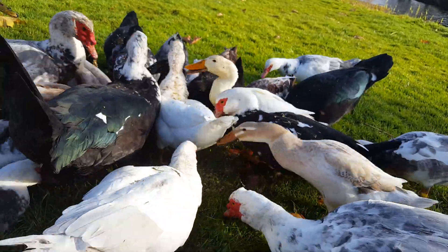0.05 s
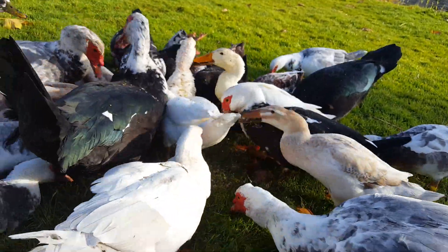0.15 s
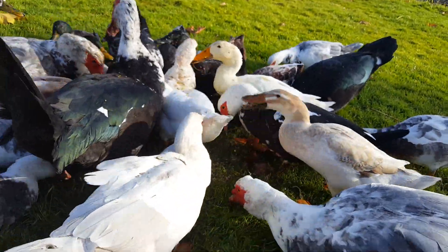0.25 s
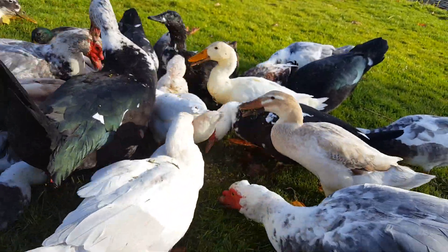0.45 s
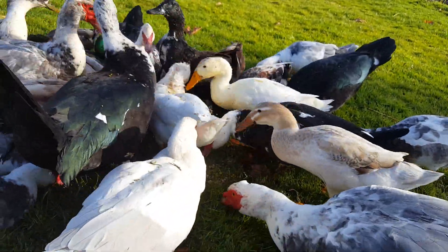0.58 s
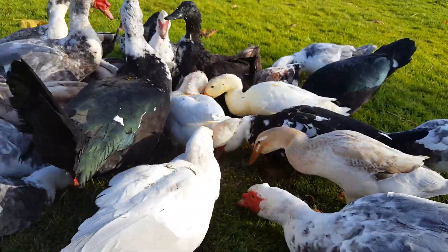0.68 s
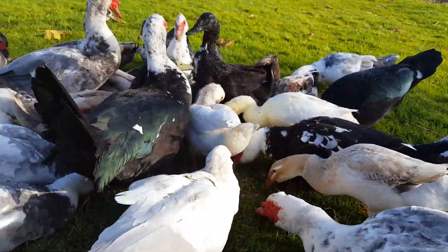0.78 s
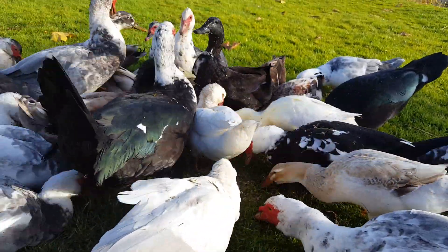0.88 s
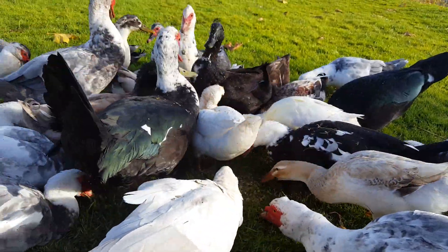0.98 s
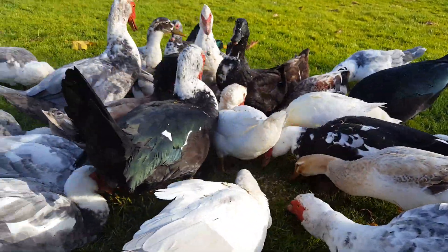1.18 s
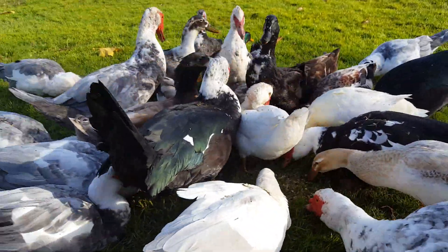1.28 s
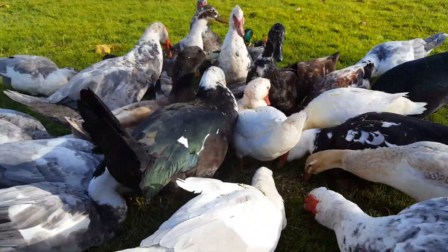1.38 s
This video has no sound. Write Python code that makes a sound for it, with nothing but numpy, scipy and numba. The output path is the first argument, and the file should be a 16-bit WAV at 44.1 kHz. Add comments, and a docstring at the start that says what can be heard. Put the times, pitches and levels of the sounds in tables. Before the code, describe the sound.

A duck gives one short, low quack at about 0.25 seconds, close by and louder than everything else. From the start, feathers and grass rustle and crackle softly over quiet outdoor air, with a soft thud and scattered pecks and bill snaps. A faint hoarse tone wavers around 0.8 seconds. The pecking continues, and a few low thuds come between 1.0 and 1.5 seconds.

```python
"""Ducks feed on a lawn close to the microphone. From the start, feathers and grass rustle and crackle
over quiet outdoor air; a soft thud sounds and bills begin to snap and peck. A quarter second in, one duck
gives a short, low quack: about a dozen pulses ring its throat while the bill opens and shuts.
The pecking goes on, a faint hoarse tone wavers past around 0.8 s, and more low thuds close the scene."""
import sys
import numpy as np
from scipy import signal
from scipy.fft import rfft, irfft
from scipy.io import wavfile
from scipy.ndimage import uniform_filter1d
from numba import njit

SR = 44100
rng = np.random.default_rng(int(sys.argv[2]) if len(sys.argv) > 2 else 0)


def materialize(psi):
    """Save the field psi as 16-bit PCM at rate SR to the path in sys.argv[1].

    A 1-D psi becomes a single channel; in a 2-D psi each row is a channel.
    """
    bounded = np.clip(np.atleast_2d(psi).T, -1, 1)
    quanta = np.round(bounded * 32767).astype(np.int16)
    wavfile.write(sys.argv[1], SR, quanta)


N = 63945
T = np.arange(N) / SR
TOP_HZ = 15950


def undb(db):
    """Decibels to gain."""
    return 10 ** (np.asarray(db) / 20)


def unit(x):
    """Scale to rms 1."""
    return x / np.sqrt(np.mean(x ** 2))


def curve(rows, column=1):
    """An automation lane: one column of a table, joined by straight lines in time."""
    rows = np.array(rows, float)
    return np.interp(T, rows[:, 0], rows[:, column])


def spectrum(points):
    """An EQ curve: (Hz, value) points spread over all frequency bins."""
    hz, value = np.array(points, float).T
    return np.interp(np.log(np.fft.rfftfreq(N, 1 / SR) + 1), np.log(hz), value)


def pan(db):
    """Left and right gains for a level difference; positive is left."""
    return undb(np.array([[db], [-db]]) / 2)


def decay(start, t60):
    """A hard attack and an exponential tail."""
    return (T >= start) * np.exp(-np.log(1000) * np.maximum(T - start, 0) / t60)


def swell(crest, half_length):
    """A bell-shaped fade in and out."""
    return np.exp(-.5 * ((T - crest) / half_length) ** 2)


def wobble(rate_hz):
    """Smooth random modulation with a spread of 1."""
    hold = int(SR / rate_hz)
    steps = np.repeat(rng.standard_normal(N // hold + 1), hold)
    return unit(uniform_filter1d(steps, hold))[:N]


@njit
def svf(x, hz, width):
    """State-variable resonator with a moving centre: its band-pass and low-pass outputs."""
    y, band_state, low_state = np.empty((2, len(x))), 0., 0.
    for i in range(len(x)):
        g, damping = np.tan(np.pi * hz[i] / SR), width / hz[i]
        v = (band_state + g * (x[i] + 1e-18 - low_state)) / (1 + g * (g + damping))
        y[0, i], y[1, i] = damping * v, low_state + g * v
        band_state, low_state = 2 * v - band_state, low_state + 2 * g * v
    return y


def band(x, hz, width):
    """One resonance."""
    return svf(x, np.minimum(hz * np.ones(len(x)), TOP_HZ), float(width))[0]


def steep_band(x, hz, width):
    """The same resonance twice, for steeper skirts."""
    return band(band(x, hz, width), hz, width)


# how alike left and right are in the ambience (frequency [Hz], likeness [0-1])
STEREO_LIKENESS = [(30, 0), (70, 0.33), (130, 0.19), (300, 0.87), (1200, 0.71), (2200, 0.018), (4000, 0),
                   (15000, 0)]
# which way its treble leans (frequency [Hz], left minus right [dB])
STEREO_LEAN = [(1500, 0), (4000, -5), (7500, 3.5), (15000, 2.5)]


def stereo_noise(colour_db=0):
    """Coloured noise, narrow in the mids and wide in the treble, whose top leans left."""
    alike, sides = np.clip(spectrum(STEREO_LIKENESS), 0, 1), np.array([[1], [-1]])
    mid, side = rfft(rng.standard_normal((2, N))) * undb(colour_db)
    left_right = mid * np.sqrt(1 + alike) + side * np.sqrt(1 - alike) * sides
    return unit(irfft(left_right * undb(spectrum(STEREO_LEAN) * sides / 2), N))


def noise_band(hz, width):
    """A steep band of stereo noise."""
    return unit(np.array([steep_band(channel, hz, width) for channel in stereo_noise()]))


# tone of the outdoor bed (frequency [Hz], relative level [dB])
AIR_EQ = [(15, -38), (25, -8), (87, 1), (200, -9), (277, -2), (754, -17), (1370, -11), (7510, -23),
          (9570, -33), (12500, -27), (16000, -37)]


def background():
    """Quiet outdoor air, the rumble of a light breeze on the microphone and a faint, distant drone."""
    air = undb(-49) * stereo_noise(spectrum(AIR_EQ))
    rumble = undb(-49) * noise_band(hz=91.6, width=101)
    drone = undb(-58) * noise_band(hz=266, width=56)
    return air + rumble + drone


# faders of the three rustle layers (time [s], low mids [dB], mids [dB], treble [dB])
RUSTLE_LEVELS = [(0, -54.5, -50, -86), (.07, -56.5, -54.5, -61), (.11, -52, -58.5, -52),
                 (.2, -50, -48.5, -57.5), (.4, -58.5, -59, -57.5), (.47, -47, -65, -52),
                 (.5, -53.5, -60, -50.5), (.56, -52, -57, -50.5), (.62, -49, -66, -55.5),
                 (.69, -56, -69, -57.5), (.77, -58, -53.5, -54), (.84, -73, -53, -63),
                 (.94, -53.5, -49.5, -56.5), (1.05, -53.5, -48.5, -53.5), (1.11, -48, -49.5, -56.5),
                 (1.23, -51.5, -47, -51.5), (1.3, -57.5, -55.5, -59), (1.34, -52, -77, -49.5),
                 (1.38, -54.5, -83, -60.5), (1.45, -47, -69, -62)]
# the low-mid and mid layers (centre [Hz], width [Hz])
RUSTLE_MIDS = [(760, 570), (1400, 1190)]
# tone of the treble layer (frequency [Hz], relative level [dB])
SWISH_EQ = [(1500, -6), (3500, 12.5), (5500, 3.5), (7800, 8.5), (10000, -2), (13000, 2.5), (16000, -4.5)]
SWISH_PAN_DB, FLUTTER_DB = 2.5, 2.5


def rustle():
    """Feathers and grass brush in uneven swells as the birds jostle."""
    layers = [noise_band(hz, width) for hz, width in RUSTLE_MIDS]
    layers.append(stereo_noise(spectrum(SWISH_EQ)) * pan(SWISH_PAN_DB))
    mix = sum(layer * undb(curve(RUSTLE_LEVELS, column)) for column, layer in enumerate(layers, 1))
    return mix * undb(FLUTTER_DB * wobble(120))


def crackles(per_s=60, centre_hz=5900, softest_db=-53.5, spread_db=6):
    """Grass blades tear and snap at random all around."""
    out, size = np.zeros((2, N)), 512
    for when, softness, pitch, place in rng.random((int(per_s * N / SR), 4)):
        hz = centre_hz * 2 ** (1.6 * (pitch - .5))
        tick = band(rng.standard_normal(size) * decay(0, t60=0.0053)[:size], hz, hz * 0.5)
        gain = undb(softest_db - spread_db * np.log(max(softness, .12)))
        position = pan(SWISH_PAN_DB / 2 + 20 * (place - .5))
        i = int(when * (N - size))
        out[:, i:i + size] += position * gain * tick / abs(tick).max()
    return out


# low bumps (crest time [s], half length [s], level [dB])
THUD_CUES = [(0.02, 0.0086, -36), (0.774, 0.032, -44.5), (1.034, 0.023, -37), (1.331, 0.02, -39),
             (1.401, 0.014, -32.5), (1.449, 0.0087, -31)]


def thuds():
    """Soft low bumps, a few cycles each: short swells of a levelled rumble."""
    envelope = sum(undb(db) * swell(crest, half_length) for crest, half_length, db in THUD_CUES)
    rumble = noise_band(hz=108.5, width=88)
    running_power = uniform_filter1d(np.mean(rumble ** 2, axis=0), int(0.031 * SR))
    return envelope * rumble / np.sqrt(running_power)


# pecks and bill snaps
# (time [s], ring peak [dB], ring pitch [Hz], knock re ring [dB], ring t60 [s], left minus right [dB])
PECK_CUES = [(0.089, -38, 2280, -18, 0.041, -1), (0.1454, -27.5, 3950, -9.5, 0.0048, -1),
             (0.2053, -34, 1210, 8, 0.015, -1), (0.3556, -33, 1410, 4, 0.016, 0),
             (0.3551, -33, 5760, -5, 0.0026, 9), (0.3927, -34.5, 3800, -2, 0.015, -2),
             (0.4461, -39, 4600, -22, 0.013, -12), (0.626, -36.5, 3400, -3, 0.016, -8),
             (0.6461, -24.5, 3290, -12, 0.0017, 3.5), (0.7201, -38, 6900, 0.5, 0.0055, 3),
             (0.7457, -41.5, 5100, 3, 0.0078, -7), (.893, -41, 5600, 3.5, .008, 7),
             (0.948, -38.5, 4640, -3, 0.0062, -1), (1.0672, -35.5, 1300, -10, .008, -5),
             (1.081, -46, 1180, 8, 0.0084, 4), (1.096, -38.5, 3560, 4, 0.016, -9.5),
             (1.153, -42, 5950, -12, 0.012, 12), (1.211, -38, 6550, -10, 0.024, -2),
             (1.227, -39, 7040, -13, .006, 8), (1.2444, -28.5, 1250, -12, 0.014, 1.5),
             (1.2447, -39.5, 4530, -9, .007, -2)]


def pecks(knock_hz=460, knock_width_hz=990, crack_db=-26):
    """Each peck is a crack, a brief ring of the bill and a dull knock."""
    out = np.zeros((2, N))
    for start, db, hz, knock_db, t60, pan_db in PECK_CUES:
        crack = rng.standard_normal(N) * decay(start, t60)
        thump = rng.standard_normal(N) * decay(start, t60=0.02)
        ring = steep_band(crack, hz, width=0.43 * hz)
        knock = band(band(thump, knock_hz, knock_width_hz), knock_hz, 2 * knock_width_hz)
        parts = [(ring, 0), (knock, knock_db), (crack, crack_db)]
        out += pan(pan_db) * sum(undb(db + part_db) * y / abs(y).max() for y, part_db in parts)
    return out


# throat resonances with the bill open (centre [Hz], width [Hz])
THROAT_FORMANTS = [(830, 600), (1205, 120), (1660, 230), (2130, 174), (2420, 220)]
# the bill's opening sweeps them (time [s], factor on the centres [ratio])
BILL_SWEEP = [(.222, 1.2), (.239, 0.57), (.247, 0.965), (.257, 1.044), (.275, 0.982), (.29, 0.95),
              (.303, 0.813), (.32, 0.806)]


def throat(x):
    """A chain of resonances that follow the bill, evened out by their own running level."""
    sweep = curve(BILL_SWEEP)
    for hz, width in THROAT_FORMANTS:
        x = svf(x, hz * sweep, float(width))[1]
    return x / np.sqrt(uniform_filter1d(x ** 2, SR // 100) + 1e-12)


# the quack's top edge (centre [Hz], width [Hz], level re throat [dB])
UPPER_FORMANTS = [(2960, 1370, -23.5), (5300, 900, -35)]


def overtones(x):
    """Faint resonances above the throat's."""
    return sum(undb(db) * unit(steep_band(x, hz, width)) for hz, width, db in UPPER_FORMANTS)


def soften(x, effort_db, edge_hz=1700., darken_db_per_db=0.3):
    """The voice darkens as the effort falls."""
    edge = np.full(N, edge_hz)
    dull = svf(x, edge, 1.36 * edge_hz)[1]
    dull = svf(dull[::-1].copy(), edge, 1.56 * edge_hz)[1][::-1]  # backwards, to undo the lag
    return dull + (x - dull) * undb(darken_db_per_db * (effort_db - effort_db.max()))


# the quack's pitch line (time [s], pitch [Hz])
QUACK_PITCH = [(.236, 276.2), (.2435, 266.6), (.2455, 197.4), (.258, 205.2), (.261, 197.6), (.273, 198.4),
               (.277, 222.3), (.281, 220), (.292, 240.4), (.297, 257), (.306, 216)]
# the push behind the voice (time [s], low body [dB], throat [dB])
QUACK_EFFORT = [(.215, -98, -75), (.228, -73, -44), (.238, -57, -25.5), (.245, -28, -27), (.25, -22.5, -16),
                (.257, -21, -18), (.275, -23.5, -19), (.28, -23, -23), (.297, -23.5, -34),
                (.301, -45, -27.5), (.305, -73, -26.5), (.311, -77, -51), (.33, -103, -91)]
# low body of the voice (centre [Hz], width [Hz], relative level [dB])
BODY_RESONANCES = [(223, 300, 15), (448, 150, -23)]


def quack(strongest_pulse_s=.2541, jitter=.006, shimmer_db=.7, rasp_db=-19, overtone_rasp_db=2):
    """Slightly uneven pulses, each with a puff of rasp, ring the body and throat; breath swells around."""
    cycles = np.cumsum(curve(QUACK_PITCH) * (1 + jitter * wobble(220))) / SR
    cycles -= np.interp(strongest_pulse_s, T, cycles)  # a pulse lands on this moment
    count = np.floor(cycles)
    pulses = -np.diff(count, prepend=count[0]) * undb(shimmer_db * wobble(195))
    pulses = unit(pulses - pulses.mean())
    rasp = unit(rng.standard_normal(N) * np.exp(-(cycles % 1) / 0.36))
    body_db, throat_db = curve(QUACK_EFFORT, 1), curve(QUACK_EFFORT, 2)
    body = unit(sum(undb(db) * band(pulses, hz, width) for hz, width, db in BODY_RESONANCES))
    body = signal.sosfilt(signal.butter(2, [130, 900], "band", fs=SR, output="sos"), body)
    ring = soften(throat(pulses + undb(rasp_db) * rasp), throat_db)
    ring += overtones(pulses + undb(overtone_rasp_db) * rasp)
    breath = throat(rng.standard_normal(N)) * undb(-36) * swell(crest=0.28, half_length=0.033)
    return body * undb(body_db) + ring * undb(throat_db) + breath


# bounces off the ground and the birds' bodies (delay [s], level [dB])
EARLY_REFLECTIONS = [(.00095, -20), (.0025, -24.5)]


def yard(x, left_lag_s=3e-5, pan_db=-.4, tail_db=-25):
    """The sound and its near reflections reach the right side first; a faint, short scatter follows."""
    scatter = noise_band(hz=2000, width=2300) * decay(start=0.02, t60=0.138)
    power = abs(rfft(scatter)) ** 2
    scatter /= np.sqrt(np.mean(power ** 2) / np.mean(power))  # about unity gain in its band
    near = x + sum(undb(db) * np.interp(T - delay, T, x) for delay, db in EARLY_REFLECTIONS)
    left_right = np.array([np.interp(T - left_lag_s, T, near), near])
    tail = signal.fftconvolve(near[None], scatter, axes=1)[:, :N]
    return left_right * pan(pan_db) + undb(tail_db) * tail


def murmur(centre_hz=1423, waver=.08, level_db=-53.5):
    """A faint, hoarse tone: a narrow band of noise that wavers in pitch."""
    hz = centre_hz * np.exp(waver * wobble(14))
    tone = unit(band(rng.standard_normal(N), hz, width=110))
    return tone * undb(level_db) * swell(crest=0.84, half_length=0.078)


def scene():
    """The quack among the feeding flock."""
    return background() + rustle() + crackles() + thuds() + pecks() + yard(quack()) + murmur()


def record(dry):
    """A steep high cut on the whole mix."""
    return signal.sosfilt(signal.ellip(10, .2, 70, TOP_HZ, fs=SR, output="sos"), dry)


dry = scene()
out = record(dry)
materialize(out)
```